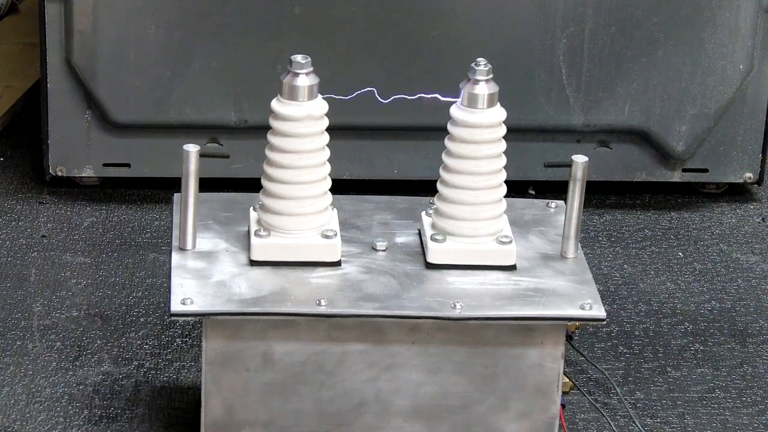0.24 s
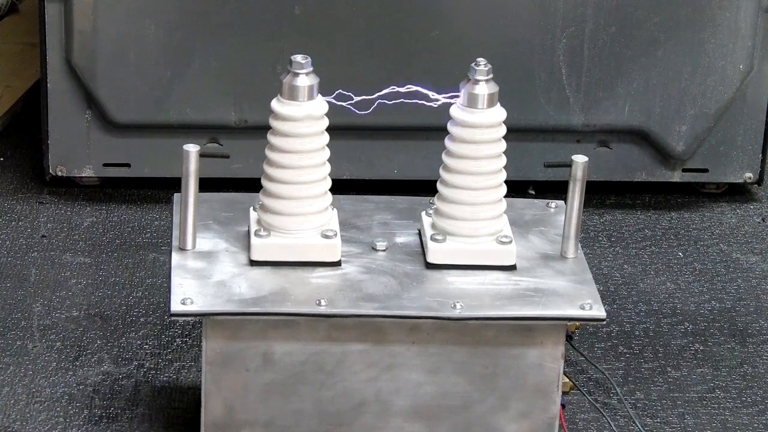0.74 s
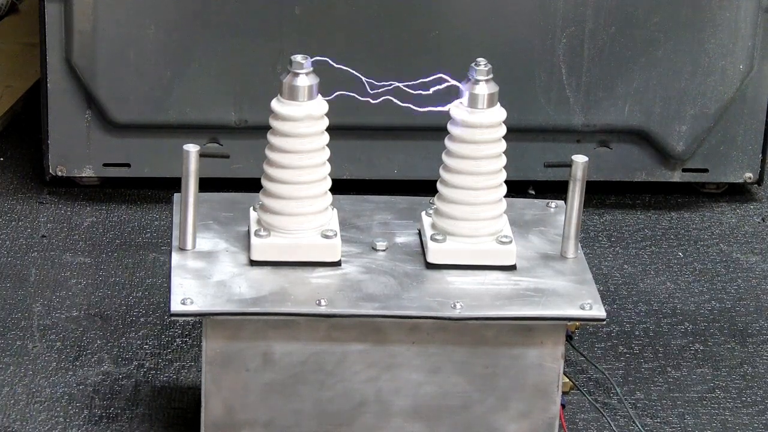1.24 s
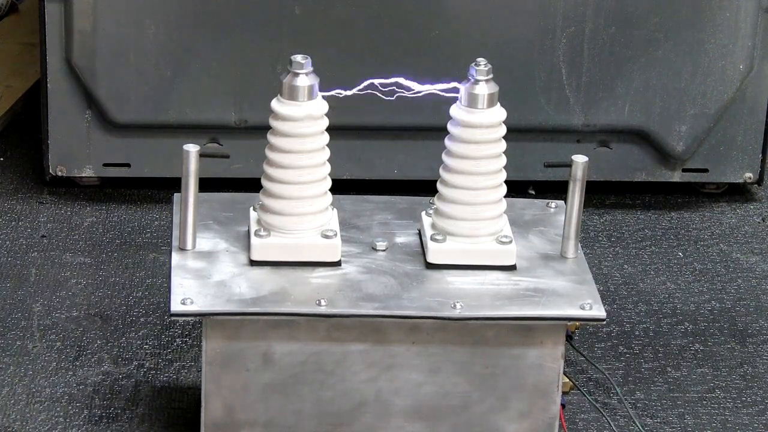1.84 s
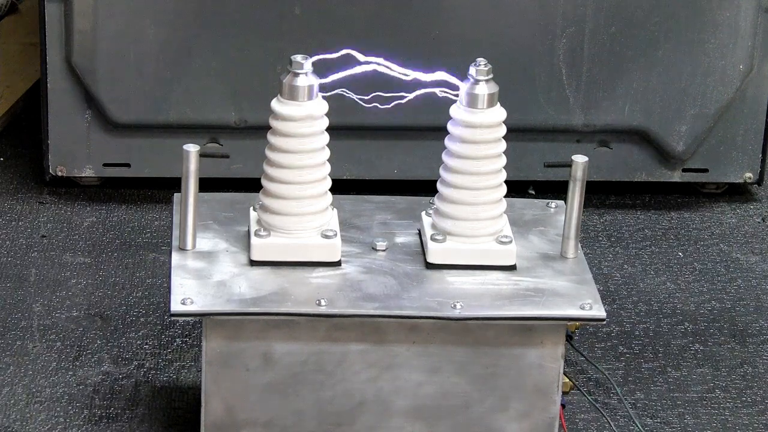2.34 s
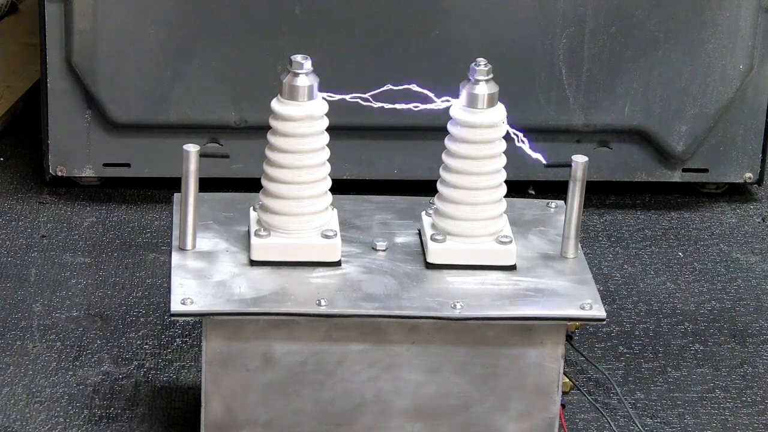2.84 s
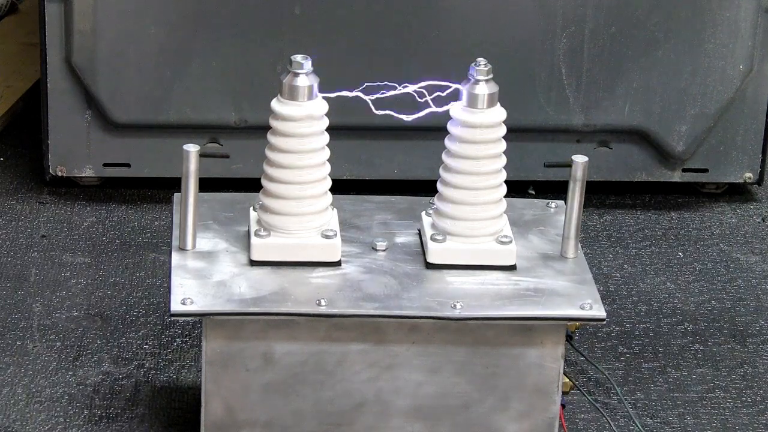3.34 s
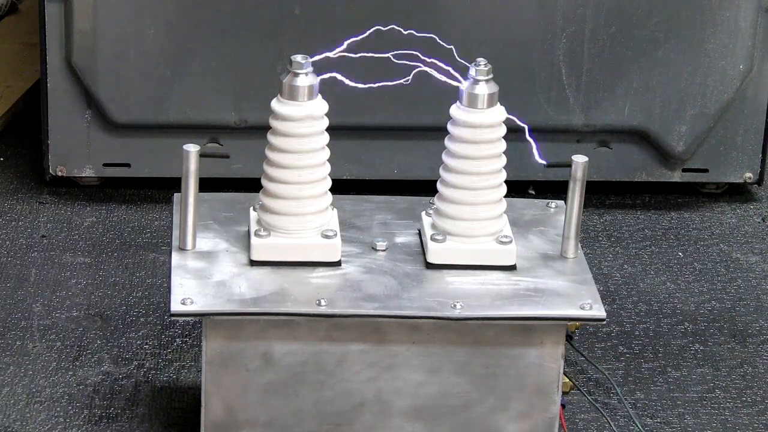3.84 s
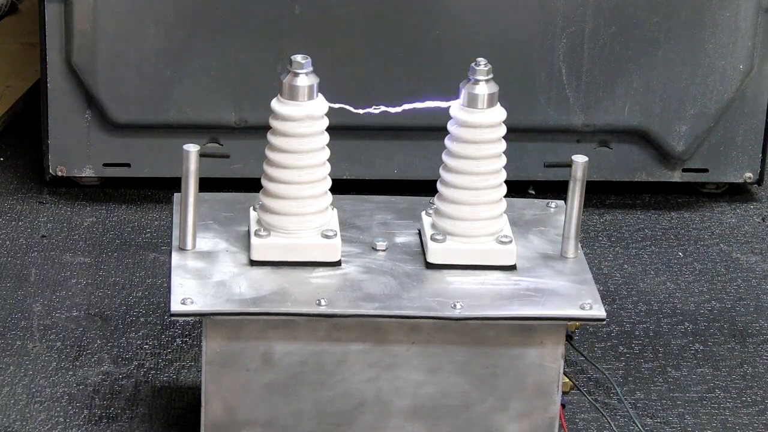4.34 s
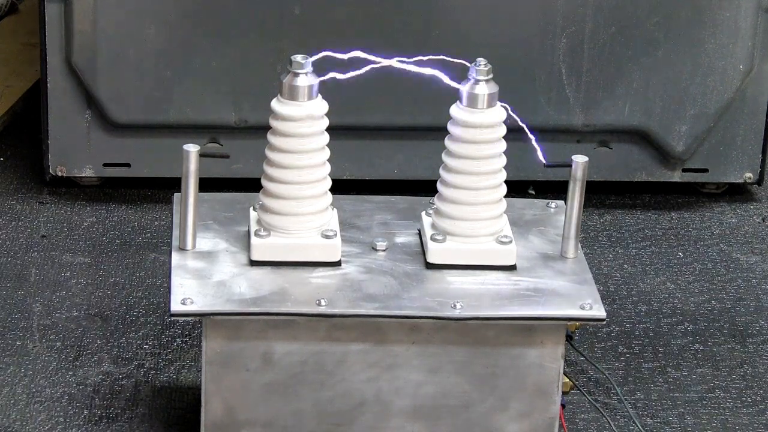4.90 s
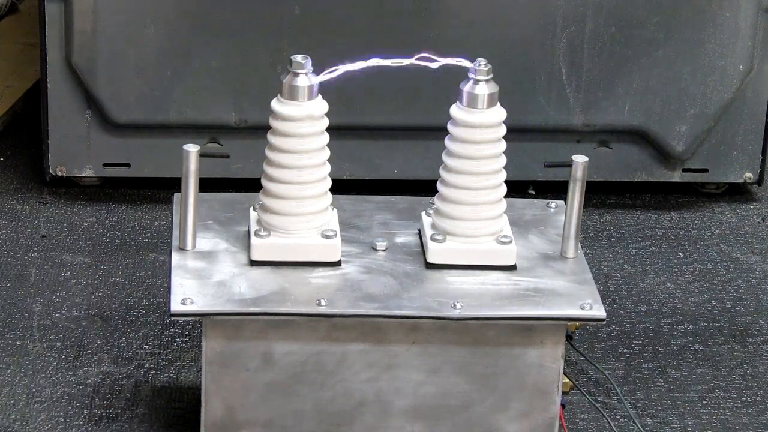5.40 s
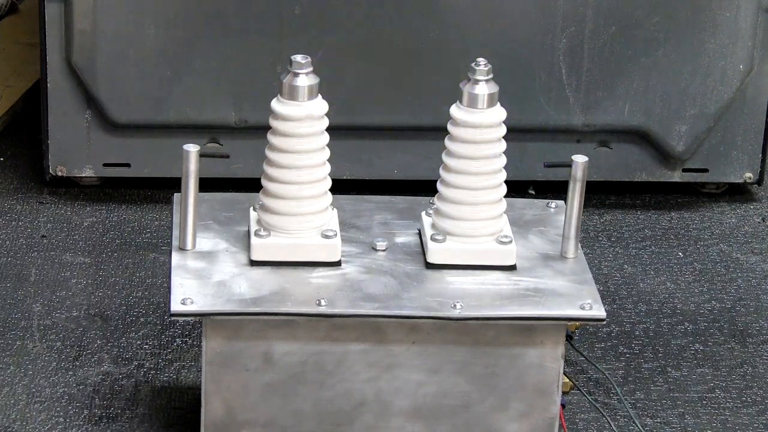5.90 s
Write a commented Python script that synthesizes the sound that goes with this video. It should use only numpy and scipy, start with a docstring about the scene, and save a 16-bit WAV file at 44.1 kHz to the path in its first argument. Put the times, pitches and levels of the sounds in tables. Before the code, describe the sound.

A high-voltage arc crackles close by in a harsh, rapid mains-rate buzz, stuttering at first, then denser and more ragged, over faint transformer hum.

```python
"""Transformer arc in a workshop

A high-voltage transformer arcs between two porcelain bushings, close to a stereo microphone.
Mains crests fire volleys of clicks: at first on one half-wave, with stalls, later at times on both.
Near the end the sparks twice weaken into a humming flame, made of steady mains harmonics.
Panels, reflections and a noise tail ring with each crack; core hum and noise rumble lie beneath.
"""
import sys
import numpy as np
from scipy import signal
from scipy.fft import rfft, irfft
from scipy.io import wavfile
from scipy.ndimage import uniform_filter1d

SR = 44100
rng = np.random.default_rng(int(sys.argv[2]) if len(sys.argv) > 2 else 0)


def persist_wave(psi):
    """Save psi, clipped to +-1, as 16-bit WAV."""
    counts = np.round(np.clip(psi, -1, 1) * 32767).astype(np.int16)
    wavfile.write(sys.argv[1], SR, np.atleast_2d(counts).T)


N = 271656
MAINS_HZ = 60.005


def amp(db):
    """Decibels to gain."""
    return 10 ** (np.asarray(db) / 20)


def unit(x):
    """Scales to rms 1."""
    return x / np.sqrt(np.mean(x ** 2) + 1e-20)


def over_time(rows, t):
    """Reads a one-column curve at the times t."""
    return np.interp(t, *np.transpose(rows))


def over_hz(rows, hz):
    """Reads every column of a spectrum on a log-frequency axis."""
    f, *columns = np.transpose(rows)
    return np.array([np.interp(np.log(hz + 1), np.log(f), c) for c in columns])


def causal(db):
    """Minimum-phase spectrum with the given gain: it rings only after a click."""
    mirrored_db = np.concatenate([db, db[..., -2:0:-1]], -1)
    log_gain = np.log(amp(mirrored_db))
    return np.exp(np.conj(signal.hilbert(log_gain)))[..., :db.shape[-1]]


def leaky_energy(clicks, memory_s):
    """Click energy summed over all paths, with exponential memory."""
    keep = np.exp(-1 / (memory_s * SR))
    return signal.lfilter([1], [1, -keep], (clicks ** 2).sum(0))


def harmonics(lines):
    """Steady sines on multiples of the mains, levels as rms."""
    turns = MAINS_HZ * np.arange(N) / SR
    out = 0
    for k, db in lines:
        out = out + np.sqrt(2) * amp(db) * np.sin(2 * np.pi * (round(k) * turns + rng.random()))
    return out


# loaded core's hum: t/s, even-harmonic level/dB, odd-harmonic level/dB
CORE = [(0, -61, -67), (.8, -60.5, -64.5), (2.2, -61, -60), (2.6, -61, -65), (3.6, -62, -66),
        (4.0, -58.5, -65), (5.2, -58.5, -66), (5.6, -60, -72), (6.16, -62, -72)]
# core spectrum: multiple of mains, relative level/dB
CORE_LINES = [(2, -9), (3, -.5), (4, 1.5), (6, -5.5), (7, .5)]


def core_hum(clicks, waver_db=1.8, waver_points=30, load_memory_s=.02, load_share=.8):
    """The core hums with the current that the sparks draw and sags in stalls; each line wavers slowly."""
    t = np.arange(N) / SR
    s, *even_odd_db = np.transpose(CORE)
    load = leaky_energy(clicks, load_memory_s)
    load = abs(uniform_filter1d(load, round(SR / MAINS_HZ)))  # one mains cycle
    relative_load = load / uniform_filter1d(load, SR)  # against 1 s around
    swing = relative_load ** (load_share / 2)  # share of the load's dB swing
    out = np.zeros(N)
    for k, db in CORE_LINES:
        waver = np.interp(t, np.linspace(0, t[-1], waver_points), rng.standard_normal(waver_points))
        level_db = np.interp(t, s, even_odd_db[round(k) % 2]) + waver_db * waver
        out += swing * amp(level_db) * harmonics([(k, db)])
    return out


# background noise shape: f/Hz, relative density level/dB
RUMBLE = [(20, -6.5), (60, -7.5), (140, -6.5), (300, -5.5), (700, -6), (2000, -7), (15000, -23.5)]


def rumble(clicks, floor_db=-50.5, apart=1.72, stirred_db=6, linger_s=.0041):
    """Low noise: a steady floor, and a flutter of heated air that follows the spark energy."""
    shared, *own = rng.standard_normal((3, N))
    shape = amp(over_hz(RUMBLE, np.fft.rfftfreq(N, 1 / SR)))
    stereo = shared + apart * np.array(own)
    noise = unit(irfft(rfft(stereo) * shape, N))
    heat = leaky_energy(clicks, linger_s)
    swell = np.sqrt(1 + amp(stirred_db) ** 2 * heat / heat.mean())
    return amp(floor_db) * swell * noise


# arc course: t/s, full volley level/dB, sputter level/dB (no flashover),
# chance that the opposite half-wave flashes over (0-1)
ARC = [(0, -19, -42, 0), (1.5, -18.5, -32, 0), (2.201, -18.5, -33, 0), (2.551, -20.5, -38, 0),
       (2.681, -20.5, -39, 0), (2.851, -21.5, -22.5, 0), (3.048, -19.5, -24.5, 0), (3.302, -22.5, -29.5, 0),
       (3.648, -20, -33, 0), (3.8, -18.5, -41, 0), (3.919, -20, -49, .7), (4.222, -17.5, -26, .5),
       (4.358, -21, -33.5, 0), (4.5, -19, -21, .6), (4.752, -19.5, -43, .7), (5.199, -18, -60, .9),
       (5.329, -22.5, -12.5, .6), (5.45, -20, -32, .5), (5.748, -21, -18.5, .6), (6.03, -22, -28, 0),
       (6.16, -20, -31, 0)]
# stalls: t/s of the new strike, mains cycles missed before it
STALLS = [(.09, 3), (.141, 1), (.173, 1), (.208, 1), (.273, 2), (.373, 1), (.423, 1), (.473, 2), (.54, 3),
          (.591, 1), (.623, 1), (.74, 1), (.79, 2), (.94, 1), (.99, 1), (1.023, 1), (1.09, 1), (1.157, 1),
          (1.29, 2), (1.39, 1), (1.441, 1), (1.591, 1), (1.623, 1), (1.707, 1), (1.757, 1), (1.824, 1),
          (1.891, 1), (1.94, 1), (2.307, 2), (3.29, 1), (3.59, 3), (3.623, 1), (3.773, 1), (4.357, 1),
          (4.757, 1), (6.032, 1)]
# individually set flashovers: t/s, level/dB, brightness/dB
FLASHOVERS = [(.108, -17, 2), (.174, -17.5, 2), (.424, -15.5, -4.5), (.474, -18.5, -6), (.558, -13.5, 0),
              (.624, -16, 1.5), (.791, -16, -3.5), (.808, -16, 4), (.874, -18.5, -2), (.958, -17.5, 3),
              (1.024, -17, 0), (1.041, -16.5, 2), (1.091, -17, 4), (1.124, -17, -1), (1.158, -15, 4),
              (1.291, -17.5, -4), (1.391, -18.5, -3), (1.474, -15.5, 4), (1.557, -16, 5), (1.624, -14, 6.5),
              (1.674, -17, 2), (1.707, -16.5, 1), (1.824, -16, -1.5), (1.907, -16, -2), (1.941, -19.5, 9),
              (1.991, -16.5, 3), (2.207, -14, -1), (2.249, -17.5, -5), (2.307, -15.5, 3), (2.357, -16, 2),
              (2.382, -17, -5), (2.449, -17, -3), (2.457, -15, 0), (2.491, -16.5, 5), (2.532, -15, 7),
              (2.549, -20, 2), (2.566, -21, 2), (2.582, -21, 10), (2.591, -18, -2), (2.749, -25, 16),
              (3.116, -16.5, -6), (3.182, -15.5, 0), (3.232, -21.5, 2), (3.249, -18, 4), (3.291, -15, 3.5),
              (3.316, -19, 13), (3.332, -19, -1), (3.357, -17.5, 4), (3.399, -15.5, 1), (3.441, -15.5, 6),
              (3.482, -15, 6), (3.516, -19.5, 6), (3.591, -17, 3), (3.682, -16, 5), (3.732, -19, 7),
              (3.816, -17.5, 11), (3.899, -15, -5.5), (4.116, -17.5, 8), (4.298, -16.5, -5.5),
              (4.491, -16.5, 4), (4.666, -12.5, 3), (4.799, -26, -15), (5.024, -20, 11), (5.182, -21.5, 0),
              (5.191, -15.5, 4), (5.257, -21.5, 16), (5.499, -14, 5), (5.507, -16.5, 9), (5.674, -19, 14),
              (6.032, -21, 3), (6.049, -21.5, -1), (6.107, -18.5, 4)]


def volleys(scatter_db=1.22, sputter_scatter_db=2.5, bright_scatter_db=2.25):
    """Time, level and brightness of the volley at each mains crest: flashover, sputter or stall."""
    first_crest_s, opposite_lead_s = .0074, .0005
    restrike_db, hot_gap_db, misfire_share = -1.05, -1.5, .12
    crest = np.arange(int(2 * MAINS_HZ * N / SR))
    s = first_crest_s + crest / (2 * MAINS_HZ)
    opposite = crest % 2 == 1
    chance, bright = np.clip(rng.standard_normal((2, len(s))), -2, 2)
    times, *columns = np.transpose(ARC)
    full_db, sputter_db, both = (np.interp(s, times, c) for c in columns)
    # where both half-waves fire, the easy one may misfire
    flash_chance = np.where(opposite, both, 1 - misfire_share * both)
    flashes = rng.random(len(s)) < flash_chance
    db = np.where(flashes, full_db + scatter_db * chance, sputter_db + sputter_scatter_db * chance)
    db += hot_gap_db * np.roll(flashes & opposite, 1)  # gap still hot: softer
    bright = bright_scatter_db * bright
    for start, end, quench_db in FLAMES:
        db -= quench_db * burning(s, start, end)
    for at, missed in STALLS:
        k = np.argmin(abs(s - at))
        db[k - 2 * missed:k] = -np.inf
        db[k] = full_db[k] + restrike_db
    for at, level_db, bright_db in FLASHOVERS:
        k = np.argmin(abs(s - at))
        db[k], bright[k] = level_db, bright_db
    return s - opposite_lead_s * opposite, db, bright


def snaps(bright_db, size=7):
    """Click shape per volley: hard and thin, or soft and full."""
    soft = np.hanning(size) / np.hanning(size).sum()
    hard = signal.unit_impulse(size, "mid") - soft
    return amp(-bright_db / 2)[:, None] * soft + amp(bright_db / 2)[:, None] * hard


def sparks(level_db=26.5, recharge_s=.00075, unevenness=.2, jitter_s=.00013, size_scatter_db=3.5,
           rise_db_per_spark=.5, typical_sparks=4.19, max_sparks=7, paths=20):
    """The gap recharges and snaps several times per volley; one click train per path through the air."""
    s, db, bright_db = volleys()
    wait, size = rng.standard_normal((2, len(s), max_sparks))
    wait = recharge_s * np.exp(unevenness * wait)
    start = s + jitter_s * rng.standard_normal(len(s))
    at = start[:, None] + np.cumsum(wait, 1) - wait[:, :1]
    rank = np.arange(max_sparks)
    spark_count = np.maximum(typical_sparks + rng.standard_normal((len(s), 1)), 2)
    fired = np.clip(spark_count - rank, 0, 1)  # last spark may be partial
    size = fired * amp(size_scatter_db * size + rise_db_per_spark * rank)
    # sparks share the volley's energy
    size *= amp(db + level_db)[:, None] / np.linalg.norm(size, axis=1, keepdims=True)
    path = rng.integers(0, paths, (len(s), 1, 1))  # one path per volley
    shape = snaps(bright_db)
    clicks = np.zeros((paths, N))
    samples = np.clip(at[..., None] * SR + np.arange(shape.shape[1]), 0, N - 1).astype(int)
    np.add.at(clicks, (path, samples), size[..., None] * shape[:, None])
    return clicks


# near reflections from lid, back panel and floor: delay t/s, left gain, right gain (direct = 1)
ECHOES = [(.0011, 0.18, 0.45), (.0034, -0.75, 0.043), (.0052, -0.058, 0.14), (.0077, -0.1, -0.17),
          (0.0126, 0.6, 0.25), (0.014, -0.0069, 0.11)]
# workshop tail: f/Hz, level/dB against direct before build-up, left-right likeness (-1 to 1)
ROOM = [(100, -4, -0.1), (300, 1, 1), (700, 4.5, .4), (1360, 3, -0.1), (2760, -1.5, 0.55), (4530, 2, 0.57),
        (7060, 1.5, -0.27), (9300, -2.5, 0.89), (12960, -5, 0.4), (13900, -0.5, 0.2)]
# workshop ring time: f/Hz, t60/s
ROOM_DECAY = [(200, .22), (1350, .26), (2760, .24), (4500, .2), (9000, .19), (14000, .22)]


def workshop(clicks, rasp_db=-1, rasp_s=.0006, build_s=.0045, shared=.6, shared_hz=2500,
             wander_s=.00006, size=12288):
    """Each path: a shock, a short rasp from its crooked channel, near reflections and a diffuse tail."""
    noise = rng.standard_normal((len(clicks) + 1, 2, size))
    hz, t, z = signal.stft(noise, SR, nperseg=256)
    wet_db, same = over_hz(ROOM, hz)[:, :, None]
    t60 = over_hz(ROOM_DECAY, hz).T
    same = np.clip(same, -1, 1)
    z[:, 1] = same * z[:, 0] + np.sqrt(1 - same ** 2) * z[:, 1]
    # all paths share part of the noise, least in the treble
    kept = shared / np.hypot(1, hz[:, None] / shared_hz)
    z = kept * z[0] + np.sqrt(1 - kept ** 2) * z[1:]
    unit_energy = np.sqrt(2 * np.log(1000) / (t60 * SR))
    decay = amp(wet_db) * np.exp(-np.log(1000) * t / t60) * unit_energy
    rasp, tail = signal.istft(np.array([z, z * decay]), SR, nperseg=256)[1][..., :size]
    age = np.arange(size) / SR
    rasp_gain = amp(rasp_db) * np.exp(-age / rasp_s) * np.sqrt(2 / (rasp_s * SR))
    response = rasp_gain * rasp + tail * (1 - np.exp(-age / build_s))
    response[..., 0] += 1  # direct shock
    for delay, left, right in ECHOES:
        for path in response:  # each path a little nearer or farther
            path_delay_s = abs(delay + wander_s * rng.standard_normal())
            path[:, round(path_delay_s * SR)] += left, right
    return signal.oaconvolve(clicks[:, None], response, axes=2).sum(0)[:, :N]


# spark thump: t/s, extra level/dB
BODY = [(0, 7.5), (.8, 7), (1.4, 4.5), (2, 0), (3, 0.5), (4, 0), (5.4, 0.5), (5.58, 1.5), (5.72, -2),
        (5.9, 4), (6.16, -1)]


def thumping(x, thump_hz=1650, snap_hz=2300, snap_q=3, trade=.7):
    """Long single sparks thump; short branching ones trade that for a higher snap."""
    body_db = over_time(BODY, np.arange(N) / SR)
    thump = signal.sosfiltfilt(signal.butter(4, thump_hz, fs=SR, output="sos"), x)
    snap = signal.filtfilt(*signal.iirpeak(snap_hz, snap_q, fs=SR), x)
    return x + (amp(body_db) - 1) * thump + (amp(-trade * body_db) - 1) * snap


# spark colour at the microphone: f/Hz, left level/dB, right level/dB
COLOUR = [(60, -41, -29), (250, -34, -33), (590, -23.5, -24), (1100, -21.5, -18), (1454, -16, -17.5),
          (2213, 0, 5.5), (3790, -6, -4), (5280, -9, -8), (7170, -17.5, -19), (8040, -15, -14),
          (10160, -3.5, 3), (11750, 0, -1), (13530, -8, -9.7), (15700, -14.5, -16)]
# resonant bumps in the crack colour: f/Hz, width/Hz, level/dB
RESONANCES = [(800, 150, 2.5), (1335, 190, 7.5), (1600, 150, 5), (1890, 140, 4), (2230, 260, 1),
              (2550, 220, 2.5), (3145, 100, 3), (3660, 350, 3)]
# microphone port notches: f/Hz, width/Hz, level/dB
NOTCHES = [(2860, 170, -24), (4985, 130, -8)]
# lead of right port over left: f/Hz, phase/rad
PORT_PHASE = [(20, 0.5), (700, 1), (1250, 0.42), (1600, 2.12), (2900, 2.5), (3700, 4.5), (5000, 4),
              (7000, 4), (10000, 3), (12700, 4), (14000, 1.5), (16000, 2.5)]


def coloured(x, size=4096, lead_samples=64):
    """Resonant bumps and the two microphone ports filter every crack."""
    hz = np.fft.rfftfreq(size, 1 / SR)
    db = over_hz(COLOUR, hz)
    for f, width, gain_db in RESONANCES + NOTCHES:
        db = db + gain_db / (1 + (2 * (hz - f) / width) ** 2)
    ports = np.exp(.5j * over_hz(PORT_PHASE, hz) * np.array([[-1], [1]]))
    common_db = db.mean(0)
    spectrum = causal(common_db) * amp(db - common_db) * ports
    response = np.roll(irfft(spectrum), lead_samples, 1)  # room for the port lead
    return signal.fftconvolve(x, response, axes=1)[:, lead_samples:N + lead_samples]


def burning(t, start, end, form_s=.025, break_s=.033):
    """How fully a flame has formed, 0-1: linear rise and fall."""
    return np.clip(np.minimum((t - start) / form_s, (end - t) / break_s), 0, 1)


# flames that short the gap: start t/s, end t/s, spark quench level/dB
FLAMES = [(5.497, 5.652, 3.5), (5.811, 5.95, 11)]
# flame spectrum: multiple of mains, relative level/dB
FLAME_LINES = [(2, -1), (4, -7), (6, -5), (8, -5), (10, -4), (12, -5), (14, -4)]


def flame_hum(level_db=-58, linger_s=.02):
    """A flame buzzes on even mains harmonics, from just before the quenching to just after."""
    t = np.arange(N) / SR
    flame = np.max([burning(t, start - linger_s, end + linger_s) for start, end, _ in FLAMES], axis=0)
    return amp(level_db) * flame * harmonics(FLAME_LINES)


def scene():
    """The arc in its room, over hums and rumble."""
    clicks = sparks()
    cracks = coloured(thumping(workshop(clicks)))
    return cracks + core_hum(clicks) + flame_hum() + rumble(clicks)


def record(dry, clip_level=.76, edge_hz=15750):
    """Hard clipping of peaks, then a steep low-pass."""
    clipped = np.clip(dry, -clip_level, clip_level)
    lowpass = signal.firwin(511, edge_hz, window=("kaiser", 9), fs=SR)
    return signal.oaconvolve(clipped, lowpass[None], "same")


dry = scene()
out = record(dry)
persist_wave(out)
```